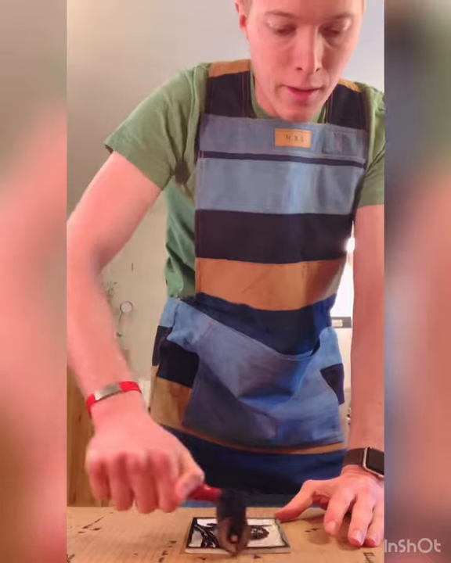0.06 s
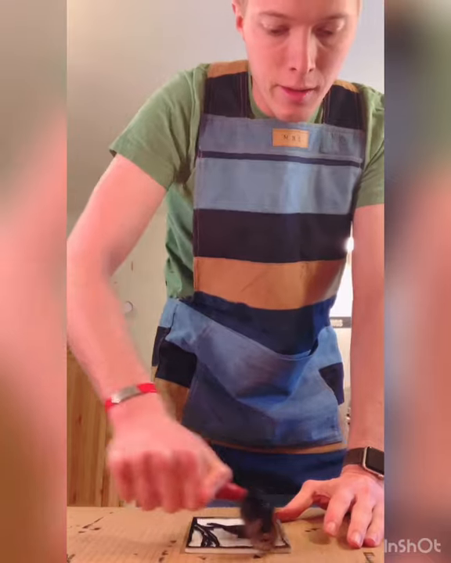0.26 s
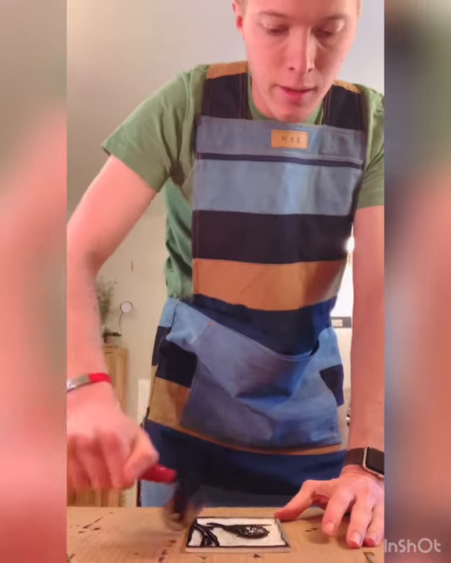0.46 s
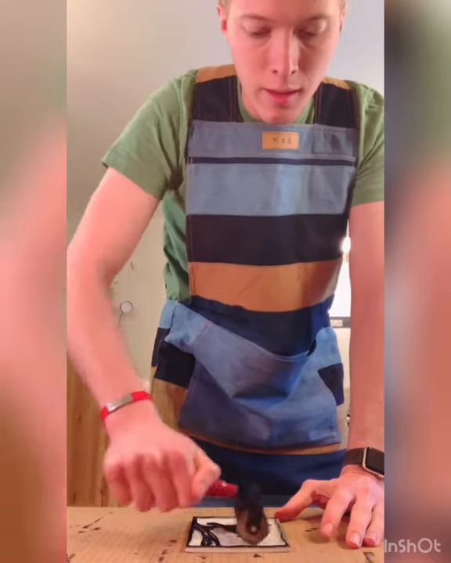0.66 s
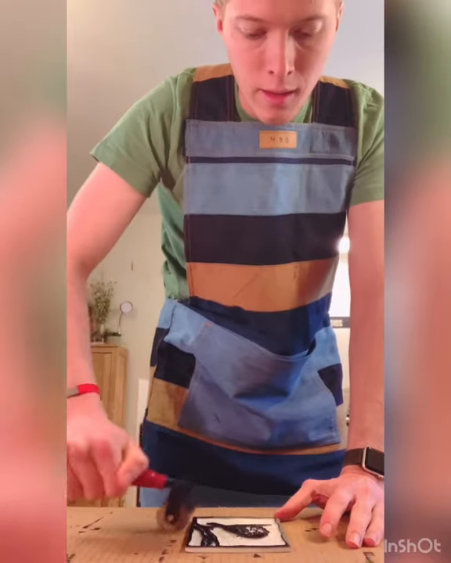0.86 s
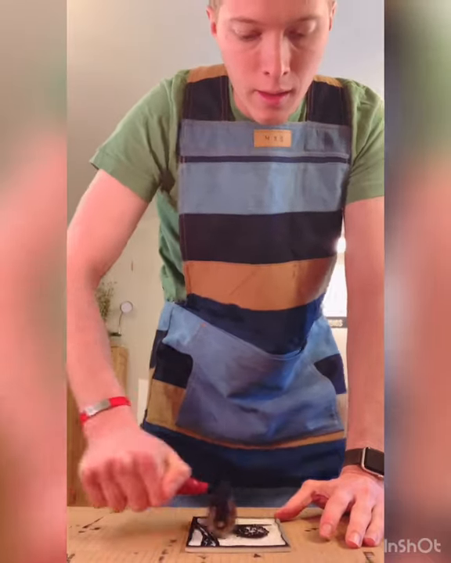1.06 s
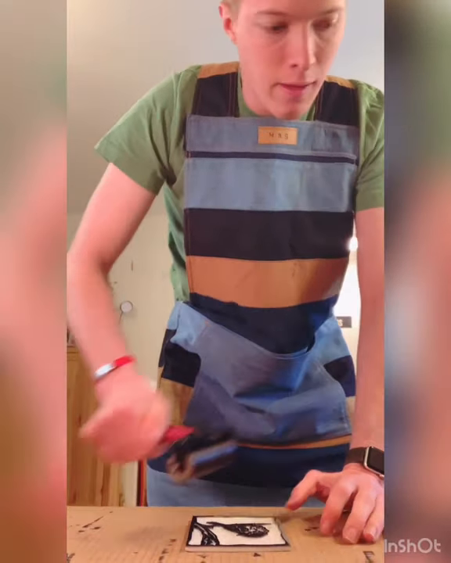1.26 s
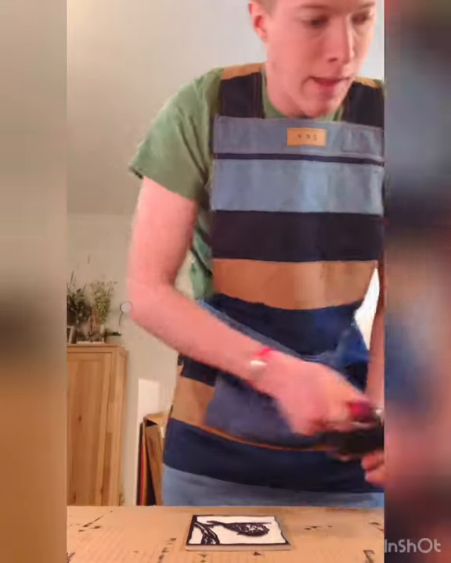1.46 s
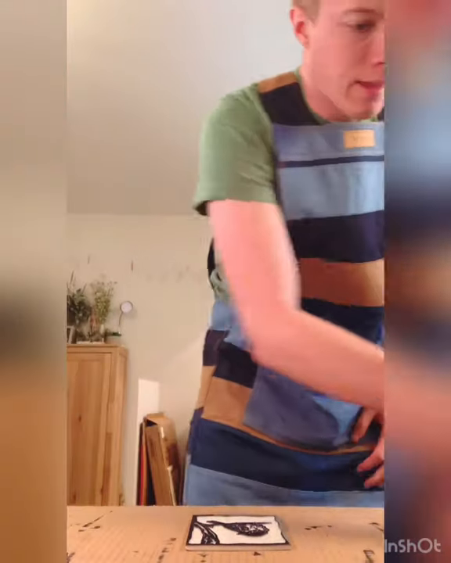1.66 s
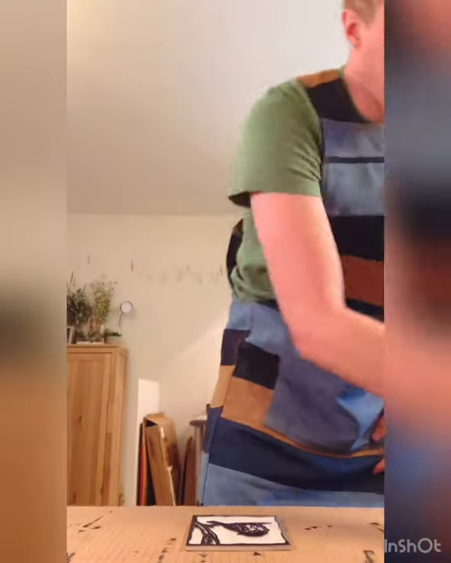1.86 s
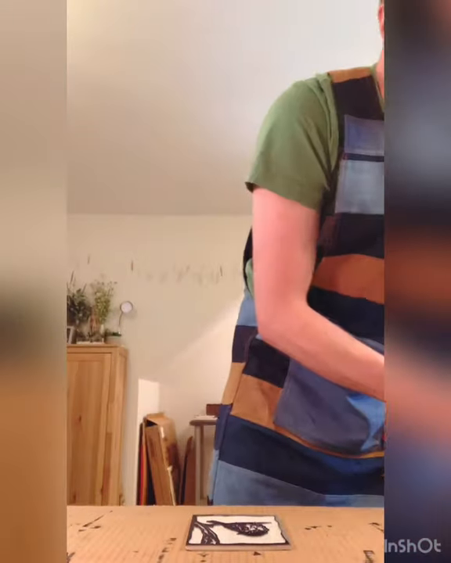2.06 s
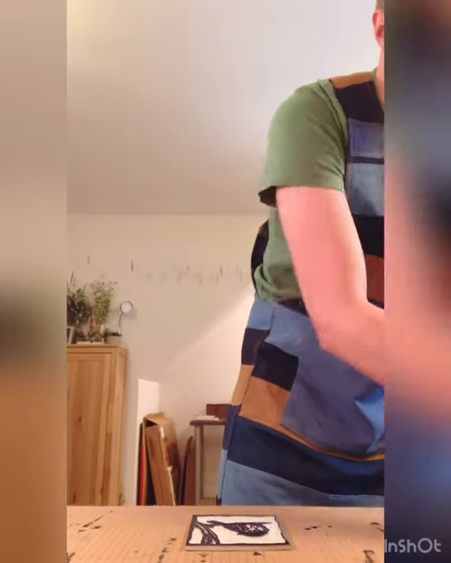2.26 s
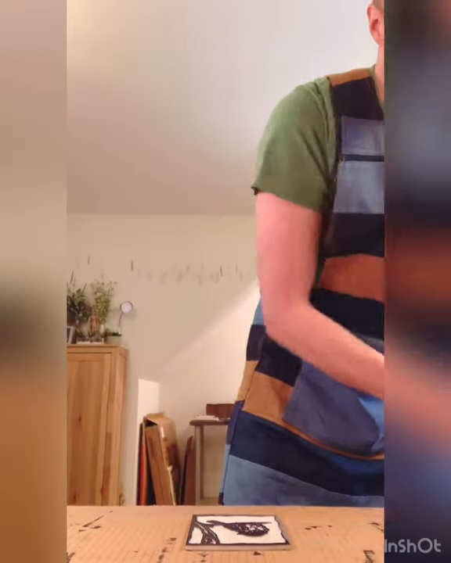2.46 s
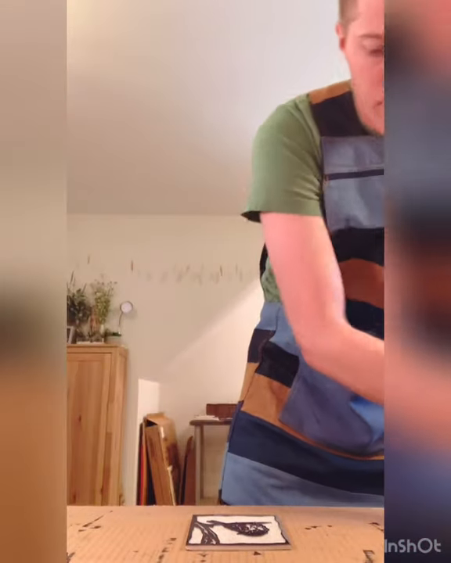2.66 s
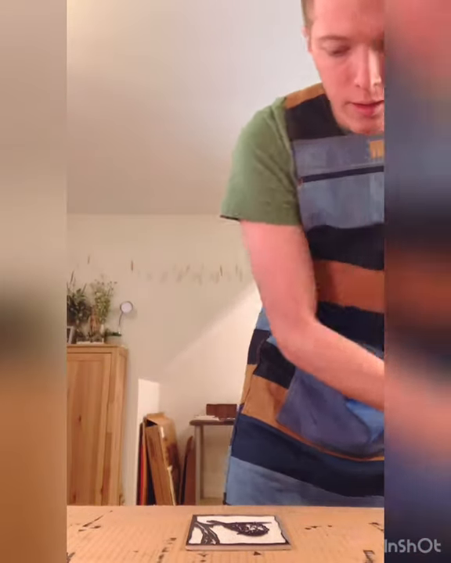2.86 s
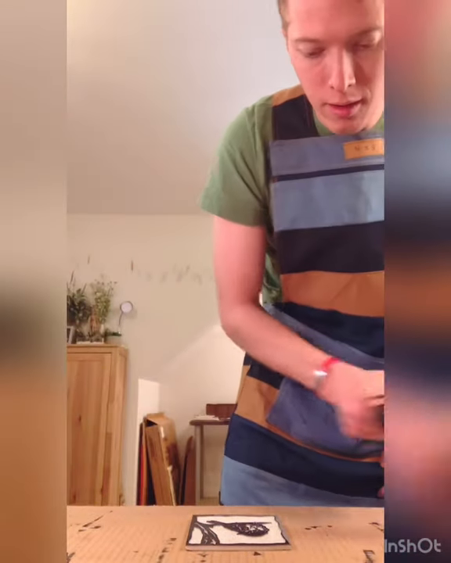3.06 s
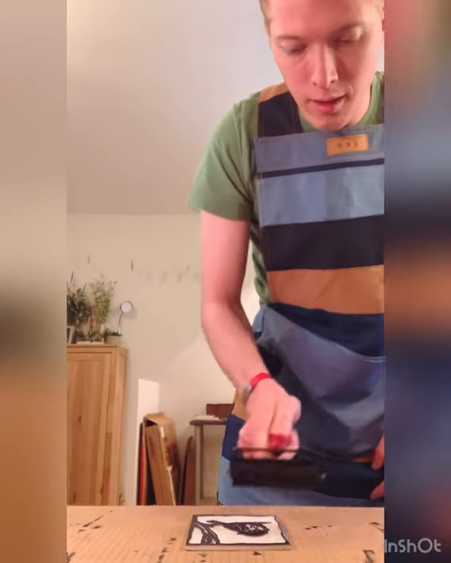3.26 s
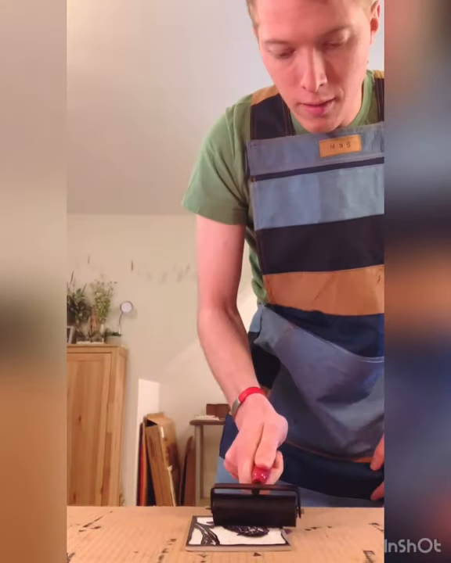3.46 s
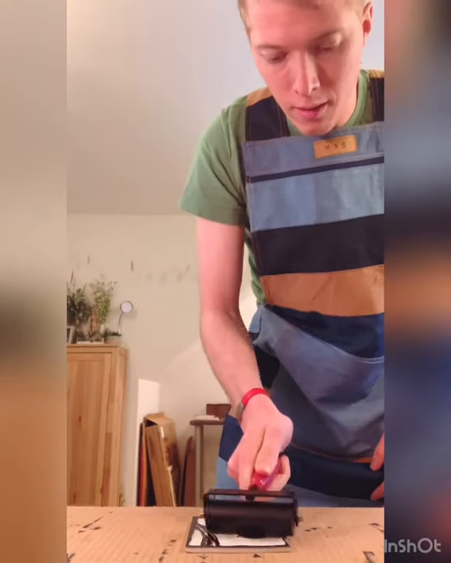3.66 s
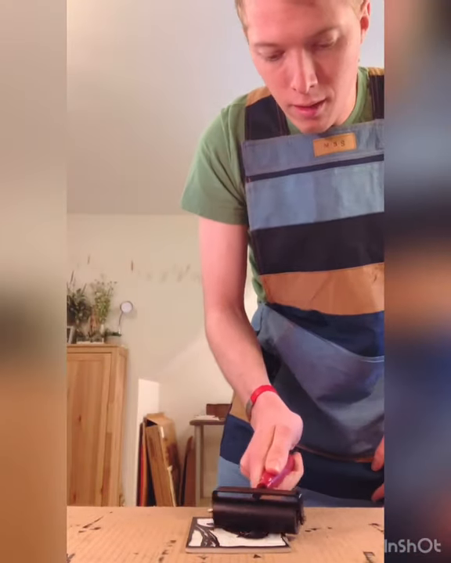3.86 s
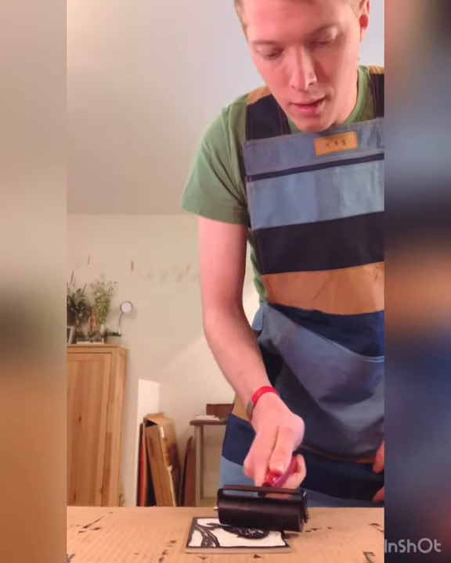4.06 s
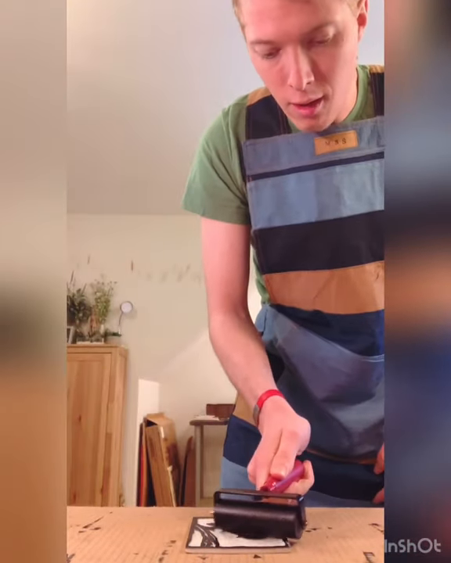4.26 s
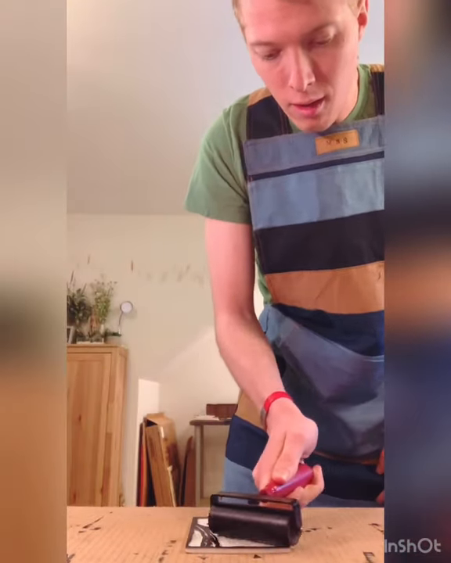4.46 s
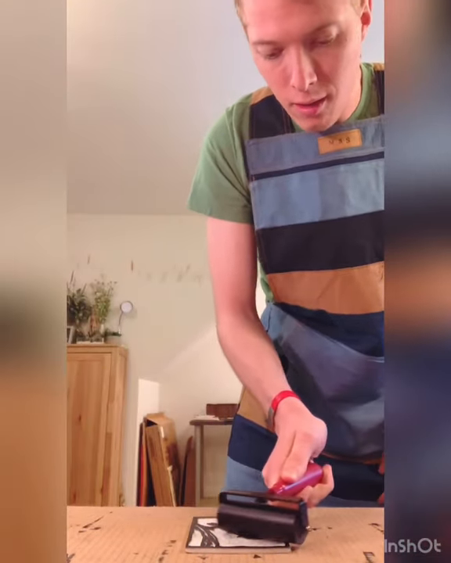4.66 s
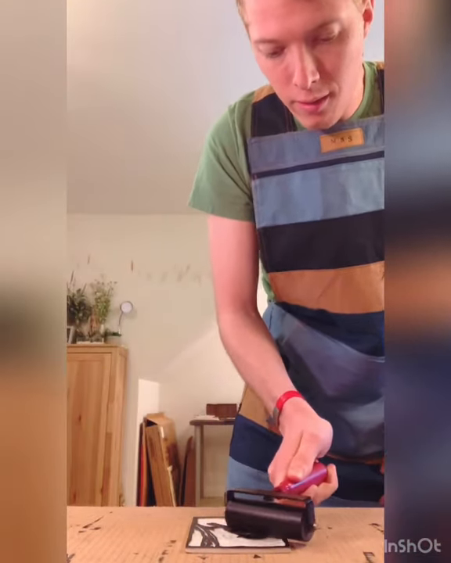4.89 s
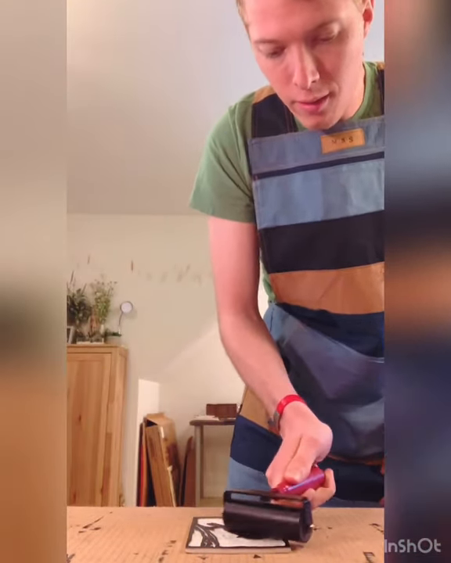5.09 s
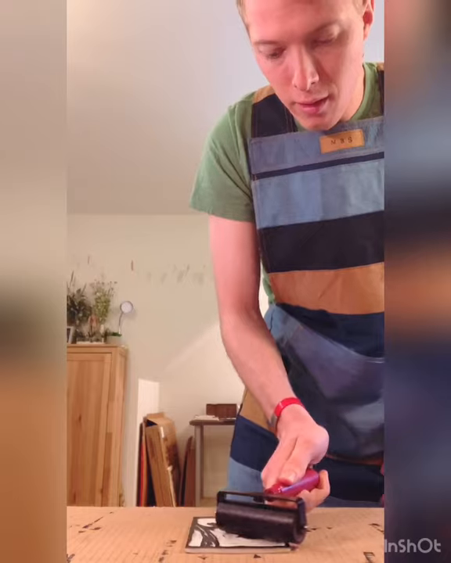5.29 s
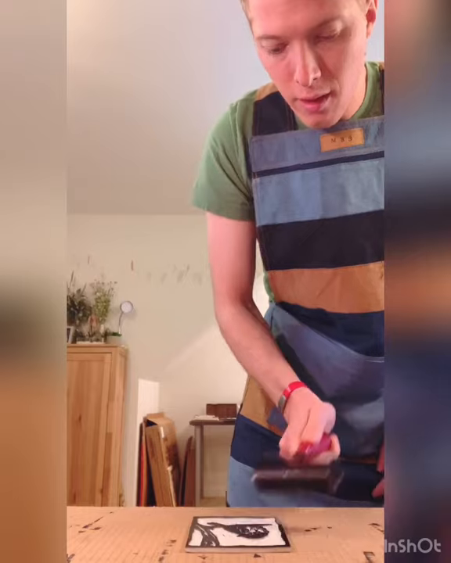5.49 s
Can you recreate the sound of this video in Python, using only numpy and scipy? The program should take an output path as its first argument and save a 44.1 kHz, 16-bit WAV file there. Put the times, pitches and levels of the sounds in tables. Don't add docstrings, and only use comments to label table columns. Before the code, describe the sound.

Short inky roller rubs with low bench rumble, thuds and axle ticks, three loud tearing passes on a slab, then brisk rolling over the block again.

```python
import sys
import numpy as np
from scipy import signal
from scipy.fft import rfft, irfft, next_fast_len
from scipy.io import wavfile
from scipy.ndimage import minimum_filter1d

SR = 44100
rng = np.random.default_rng(int(sys.argv[2]) if len(sys.argv) > 2 else 0)


def generate_wav(signal):
    frames = np.transpose(np.atleast_2d(signal))
    scaled = np.clip(frames, -1, 1) * 32767
    pcm = np.round(scaled).astype(np.int16)
    wavfile.write(sys.argv[1], SR, pcm)


def invert_db(level):
    return 10 ** (np.asarray(level, dtype=float) / 20)


N = 244005

# from_s, to_s
ON_SLAB_S = (1.806, 3.02)
# from_s, to_s
LIFTED_S = [
    (.62, .712),
    (1.05, 1.092),
    (1.77, 1.81),
    (3.3, 3.482),
]
# pitch_hz, level_db, t60_s
FRAME_MODES = [(268, -9.5, 0.036), (357.2, 0, 0.049), (392.8, 0.5, 0.034), (550, -10.5, 0.057),
               (691, -14.5, 0.044)]


def rms_one(x):
    return x / np.sqrt(np.mean(x ** 2) + 1e-20)


def coloured(x, points):
    hz, db = np.transpose(points)
    log_hz = np.log(np.arange(N // 2 + 1) * SR / N + 1)
    gain = invert_db(np.interp(log_hz, np.log(hz), db))
    return rms_one(irfft(rfft(x) * gain, N))


def ring(x, hz, t60_s):
    r = invert_db(-60 / (t60_s * SR))
    w = 2 * np.pi * hz / SR
    return signal.lfilter([0, np.sin(w)], [1, -2 * r * np.cos(w), r * r], x + 1e-18)


def body(x, modes):
    return sum((-1) ** k * invert_db(db) * ring(x, hz, t60_s) for k, (hz, db, t60_s) in enumerate(modes))


def shaken(bumps, level_db, modes):
    steady = np.sqrt(np.mean(body(bumps, modes) ** 2))
    return body(bumps * invert_db(level_db), modes) / steady


def grains(per_s, spread_db):
    sizes = invert_db(spread_db * np.minimum(rng.exponential(1, N), 4))
    signs = rng.choice([-1, 1], N)
    return sizes * signs * (rng.random(N) < per_s / SR)


def soft(x, hz):
    r = np.exp(-2 * np.pi * hz / SR)
    return signal.lfilter([(1 - r) ** 2], [1, -2 * r, r * r], x + 1e-18)


def fading(db, db_per_s):
    ramp = db_per_s * np.arange(N) / SR
    return np.maximum.accumulate(db + ramp) - ramp


def stroking():
    # start_s, length_s, ink_db, pressure_db (bench rumble), lean_db (start to stop)
    block_strokes = [(-.04, 0.16, -64.5, -46.5, -26), (0.119, .15, -63.5, -48, -11),
                     (0.273, 0.12, -58.5, -43, 29), (0.707, 0.26, -54.5, -38, 17),
                     (0.845, 0.14, -68, -46.5, -38), (1.078, 0.19, -66, -37.5, -13),
                     (1.253, 0.057, -54, -50, 2), (1.359, .09, -80, -46.5, 4),
                     (3.477, .11, -55.5, -37, -17), (3.591, 0.11, -60.5, -43.5, 7),
                     (3.724, 0.14, -52.5, -43, 2), (3.878, .12, -60, -41, -7),
                     (3.997, .13, -54, -38.5, 15.5), (4.137, 0.16, -61.5, -39.5, -9),
                     (4.268, 0.11, -53, -39.5, 14.5), (4.401, 0.12, -62, -41.5, 16),
                     (4.545, 0.11, -53.5, -44, 6.5), (4.663, 0.14, -64, -44, -7),
                     (4.815, 0.16, -60, -47, -25), (4.915, 0.21, -66, -47, -27),
                     (5.099, 0.096, -57, -43, -10), (5.244, 0.12, -67, -47, -1),
                     (5.35, .15, -52.5, -40.5, 3)]
    # start_s, length_s, ink_db, pressure_db (bench rumble), lean_db (start to stop)
    slab_strokes = [
        (1.816, 0.25, -36, -39, 11.5),
        (2.075, 0.23, -45.5, -43.5, 6.5),
        (2.317, 0.22, -33.5, -43, -6.5),
        (2.543, 0.22, -46, -47, 5),
        (2.764, 0.19, -34, -49, -6.5),
    ]
    block_start_power, slab_start_power = 0.77, 1
    landing_share = 0.4
    landings = LIFTED_S[:2] + LIFTED_S[3:]

    t = np.arange(N) / SR
    speed_db, ink_db, press_db = np.full((3, N), -120.0)
    lean_db = np.zeros(N)
    for start_s, length_s, tack_db, weight_db, tilt_db in block_strokes + slab_strokes:
        on = (t > start_s) & (t < start_s + length_s)
        part = (t[on] - start_s) / length_s
        landed = any(abs(start_s - down_s) < .04 for _, down_s in landings)
        entry = landing_share * landed
        over_slab = ON_SLAB_S[0] - .04 < start_s < ON_SLAB_S[1]
        power = slab_start_power if over_slab else block_start_power
        phase = (entry + (1 - entry) * part) ** power
        speed_db[on] = 20 * np.log10(np.sin(np.pi * phase) + 1e-4)
        ink_db[on] = tack_db
        press_db[on] = weight_db
        lean_db[on] = tilt_db * (part - .5)
    return speed_db, ink_db, press_db, lean_db


def tack(ink_db, speed_db, slab):
    speed_power = np.where(slab, 0.52, 1.5)
    return invert_db(fading(ink_db + speed_power * speed_db, db_per_s=565))


def ink(slab, tearing):
    # freq_hz, density_db_per_hz
    block_spectrum = [(1500, -33), (3000, -6), (4100, -6), (5500, -1.5), (6900, -6.5), (8300, 2),
                      (12000, -2.5), (14600, 6), (15800, 4), (16200, -39)]
    # freq_hz, density_db_per_hz
    slab_spectrum = [(2000, -4.5), (3500, -17.5), (4800, -13), (6900, -4.5), (8300, -0.5), (11000, 1.5),
                     (13000, -0.5), (15800, 0), (16200, -46.5)]
    thin = coloured(grains(13000, spread_db=5.0), block_spectrum) * invert_db(1.0)
    thick = coloured(grains(18000, spread_db=4.0), slab_spectrum)
    return tearing * ((1 - slab) * thin + slab * thick)


def shaking(press_db, speed_db, brush_db, slab):
    frame_above_db = np.where(slab, -4.5, -11)
    rub_above_db = np.where(slab, 4, -17)

    def level(above_db, speed_power, fade_db_per_s, brushed_db):
        rolled_db = fading(press_db + above_db + speed_power * speed_db, fade_db_per_s)
        return np.maximum(rolled_db, brush_db + brushed_db)

    bench_db = level(0, 0.73, 250, brushed_db=3)
    frame_db = level(frame_above_db, 1, 324, brushed_db=-9)
    rub_db = level(rub_above_db, 1.6, 398, brushed_db=-6)
    return bench_db, frame_db, rub_db


def rolling(bench_db, frame_db, rub_db, slab, moving):
    # pitch_hz, level_db, t60_s
    bench_modes = [(69.7, -4, 0.18), (93.1, -1, 0.12), (126.2, -3, 0.17), (164.2, -3.5, 0.032),
                   (206.3, -7, 0.12), (261.3, -5.5, 0.045)]
    # pitch_hz, level_db, t60_s
    slab_modes = [(550, -3.5, 0.019), (782, 3.5, 0.0076), (1141, 1.5, 0.018), (1240, 3, 0.016),
                  (1317, -0.5, 0.021), (1480, -8.5, 0.025), (1780, -10.5, 0.019), (2150, 0, 0.0036),
                  (3500, -3, 0.0055)]
    # freq_hz, density_db_per_hz
    rub_spectrum = [(300, -6), (520, 5), (720, 0), (1000, -9), (1400, -13), (2000, -19), (3000, -25),
                    (5000, -34)]

    t = np.arange(N) / SR
    touching = 1 - sum((t > up_s) * (t < down_s) for up_s, down_s in LIFTED_S)
    bench = shaken(touching * soft(grains(160, spread_db=3.0), 410), bench_db, bench_modes)
    frame = shaken(touching * soft(grains(400, spread_db=5.0), 810), frame_db, FRAME_MODES)
    block = coloured(grains(6000, spread_db=1.0), rub_spectrum) * invert_db(6.5) * moving ** 0.21
    plate = rms_one(body(grains(5000, spread_db=3.0), slab_modes)) * invert_db(4.0)
    rub = np.maximum(touching, .2) * invert_db(rub_db) * ((1 - slab) * block + slab * plate)
    return bench + frame + rub


def bending_wave():
    age_s = np.arange(SR // 5) / SR
    hz = 76 + 300 * np.exp(-age_s / .006)
    swell = (age_s / .015 * np.exp(1 - age_s / .015)) ** 1.9
    sway = 0.2 * (1 - np.exp(-age_s / 0.06)) * np.exp(-age_s / 0.07)
    return (swell + sway) * np.sin(2 * np.pi * np.cumsum(hz) / SR + 1.95)


def thuds():
    # start_s, peak_db, block_ring_db (above the peak)
    landings = [
        (0.3687, -30.5, -14),
        (0.708, -19, -9),
        (0.774, -22.5, -11),
        (0.8306, -30.5, -27),
        (1.0857, -19, -3),
        (1.83, -26, -9),
        (1.85, -29.5, -3),
        (3.4812, -22.5, -8),
        (3.4948, -19.5, -1.5),
        (4.18, -30.5, -17),
    ]
    # pitch_hz, level_db, t60_s
    block_modes = [(199.5, -6.5, 0.17), (240, -1.5, .11), (166, 0, 0.11), (524, -4, 0.05), (609, -6, .1),
                   (900, -10.5, 0.063)]
    start_s, peak_db, ring_db = np.transpose(landings)
    blows, rings = np.zeros((2, N))
    blows[(start_s * SR).astype(int)] = invert_db(peak_db)
    rings[((start_s + .003) * SR).astype(int)] = invert_db(peak_db + ring_db)
    return signal.fftconvolve(blows, bending_wave())[:N] + body(soft(rings, 500), block_modes)


def contacts():
    # start_s, tick_peak_db, knock_db (above the tick), pitch_hz
    axle_contacts = [(0.3324, -50.5, -1, 1140), (0.3698, -49, 0, 1780), (0.3774, -44, -7, 7000),
                     (0.7052, -44, 17, 1480), (0.7734, -39, -2, 1180), (0.825, -41, 6.5, 1170),
                     (0.88, -35.5, 7, 1420), (0.8864, -31, 1.5, 900), (1.0871, -33.5, 0, 2230),
                     (1.1288, -47.5, 4, 2470), (1.2163, -54.5, 8, 900), (1.3028, -42.5, -21, 3500),
                     (1.3662, -40, 5, 1580), (1.6143, -45.5, -13, 3000), (1.6603, -44.5, -2.5, 1240),
                     (3.1543, -48.5, -20, 3080), (3.478, -29, -18, 1285), (3.4969, -34, -12, 1170),
                     (3.8511, -46, 16, 2200), (4.1037, -46, 20.5, 2510), (4.178, -47, 8.5, 1530),
                     (4.37, -51, 19.5, 2900), (4.6404, -53.5, 22, 1590), (4.699, -69.5, 28.5, 1390),
                     (4.8413, -64, 17, 1170), (4.9553, -40.5, 15, 3340), (5.1186, -60, 25, 1140),
                     (5.229, -66, 7, 1410), (5.258, -54, -14, 1370), (5.5073, -49.5, 4, 2110),
                     (1.808, -32, 4.5, 1240), (1.8232, -26, 4, 1040), (1.8409, -27.5, 2.5, 1470),
                     (2.245, -36, 5.5, 1300), (2.7111, -39, 9, 1480), (2.8105, -39.5, 11, 1140),
                     (2.9592, -43.5, -1.5, 1800)]
    tick_ms, tail_ms, tail_db = 2.2, 10, -16
    snap_ms, snap_db = .8, -24
    knock_delay = round(.0028 * SR)
    size = 2400

    ticks, knock = np.zeros((2, N + SR))
    rows = axle_contacts
    crackle = rng.standard_normal((len(rows), size))
    age_ms = np.arange(size) * 1000 / SR
    decay = np.exp(-age_ms / tick_ms) + invert_db(tail_db) * np.exp(-age_ms / tail_ms)
    snap_decay = invert_db(snap_db) * np.exp(-age_ms / snap_ms)
    for (start_s, tick_db, knock_db, hz), noise in zip(rows, crackle):
        i = round(start_s * SR)
        pitched = ring(noise * decay, hz, 1.15 / hz)
        tick = pitched / np.abs(pitched).max() + noise * snap_decay
        ticks[i:i + size] += invert_db(tick_db + 8.0) * tick
        knock[i + knock_delay] += invert_db(tick_db + knock_db + 4)
    return (ticks + body(soft(knock, 2600), FRAME_MODES))[:N]


def brushing():
    # start_s, hold_s, cloth_db, rumble_db
    brushes = [(0, 0.0033, -89, -44), (0.324, 0.029, -77.5, -80), (0.43, 0.0042, -78.5, -70),
               (0.912, .12, -69, -65), (1.098, 0.13, -70, -50.5), (1.268, 0.028, -63.5, -67),
               (1.354, 0.0033, -65, -49), (1.394, 0.068, -81, -61.5), (1.566, 0.0089, -78, -60),
               (1.614, 0.0022, -62, -61.5), (1.636, 0.12, -73.5, -62.5), (2.918, .03, -72, -48.5),
               (2.991, 0.11, -78.5, -60.5), (3.154, 0.0089, -66.5, -70)]
    rise_db_per_s, fall_db_per_s = 2500, 314.5
    t = np.arange(N) / SR
    levels_db = []
    for start_s, hold_s, cloth_db, rumble_db in brushes:
        rise_db = rise_db_per_s * np.maximum(start_s - t, 0)
        fall_db = fall_db_per_s * np.maximum(t - start_s - hold_s, 0)
        levels_db.append(np.array([[cloth_db], [rumble_db]]) - rise_db - fall_db)
    return np.max(levels_db, axis=0)


def rustle(cloth_db):
    # freq_hz, density_db_per_hz
    cloth_spectrum = [(400, -23), (1000, -2), (2000, 1.5), (3500, 0), (5000, -5), (8000, -16), (11500, -17),
                      (14000, -47)]
    return invert_db(cloth_db + 13.0) * coloured(grains(5700, spread_db=2.5), cloth_spectrum)


def room(x):
    t60_s, wall_cut_hz = 0.17, 3500
    size = next_fast_len(N + SR)
    delay = np.exp(-2j * np.pi * np.arange(size // 2 + 1) / size)
    dull = np.exp(-2 * np.pi * wall_cut_hz / SR)
    walls = (1 - dull) / (1 - dull * delay)
    paths = np.zeros((2, len(delay)), complex)
    lags = (rng.uniform(.018, .05, 16) * SR).astype(int)
    for k, lag in enumerate(lags):
        loop = invert_db(-60 * lag / SR / t60_s) * delay ** lag * walls
        paths[k % 2] += loop / (1 - loop) * (-1) ** (k // 2)
    return irfft(paths * rfft(x, size), size)[:, :N]


def room_tone():
    # freq_hz, density_db_per_hz
    tone_spectrum = [(30, -6), (70, 0), (130, -13), (170, -16), (260, -21), (700, -34), (2000, -31),
                     (5000, -41), (12000, -46.5), (14500, -80), (17000, -79)]
    return invert_db(-64.5) * coloured(rng.standard_normal(N), tone_spectrum)


def scene():
    t = np.arange(N) / SR
    slab = (t > ON_SLAB_S[0]) * (t < ON_SLAB_S[1]) * 1.
    speed_db, ink_db, press_db, lean_db = stroking()
    cloth_db, brush_db = brushing()
    tearing = tack(ink_db + lean_db, speed_db, slab) + 1e-5
    top_tearing = -minimum_filter1d(-tearing, size=SR // 7)
    moving = tearing / top_tearing
    lean_share = 0.43
    shake_db = shaking(press_db + lean_share * lean_db, speed_db, brush_db, slab)

    work = ink(slab, tearing) + rolling(*shake_db, slab, moving)
    work = work + thuds() + contacts() + rustle(cloth_db)
    high_pass = signal.butter(2, 300, "high", fs=SR, output="sos")
    airborne = signal.sosfilt(high_pass, work)
    return work + room_tone() + invert_db(-9) * room(airborne)


def dropped(hz, bands):
    gain_db = 0
    for low_hz, high_hz, db in bands:
        inside = np.clip(np.minimum(hz - low_hz, high_hz - hz) / 200 + .5, 0, 1)
        gain_db = gain_db + db * inside
    return invert_db(gain_db)


def band_limit(x):
    return signal.sosfilt(signal.butter(12, 16350, fs=SR, output="sos"), x)


def record(dry):
    # freq_hz, level_db, phase_rad
    rear_port = [(30, -1.5, 0), (86, -3, -.2), (172, -5, -.3), (258, -8, -.6), (344, -13, -1.5),
                 (430, -7, -2.6), (516, -3.5, -3.5), (689, -2.2, -4.3), (1033, -1.8, -4.9),
                 (1378, -1.8, -5.45), (2400, -.4, -5.8), (6000, -.1, -6.28)]
    # from_hz, to_hz, gain_db
    mid_bands = [(2235, 2884, -2), (3800, 4450, 5.5), (4400, 5600, -5.5), (11730, 13000, -21)]
    # from_hz, to_hz, gain_db
    side_bands = [(7220, 8700, -15.5)]
    lead_s = 5 / 44100

    hz = np.arange(N // 2 + 1) * SR / N
    port_hz, port_db, port_rad = np.transpose(rear_port)
    where = np.log(hz + 1), np.log(port_hz)
    phase_rad = np.interp(*where, port_rad) + 2 * np.pi * hz * lead_s
    rear = invert_db(np.interp(*where, port_db)) * np.exp(1j * phase_rad)
    left = rfft(dry[0])
    right = rfft(dry[1]) * rear
    mid = (left + right) / 2 * dropped(hz, mid_bands)
    side = (left - right) / 2 * dropped(hz, side_bands)
    mix = irfft(np.array([mid + side, mid - side]), N)
    return band_limit(mix)


dry = scene()
out = record(dry)
generate_wav(out)
```